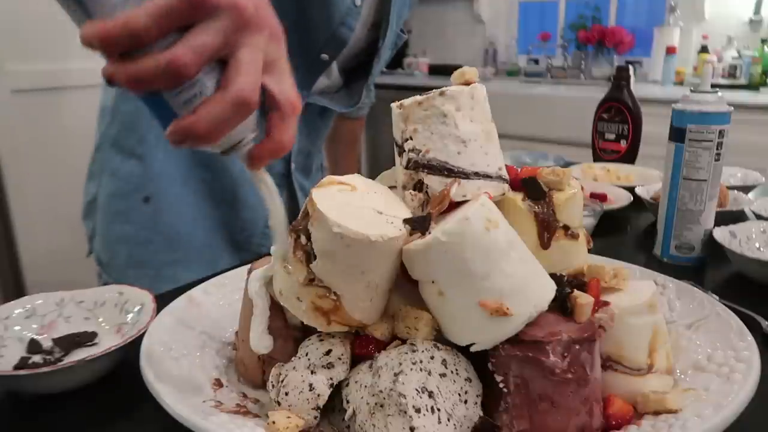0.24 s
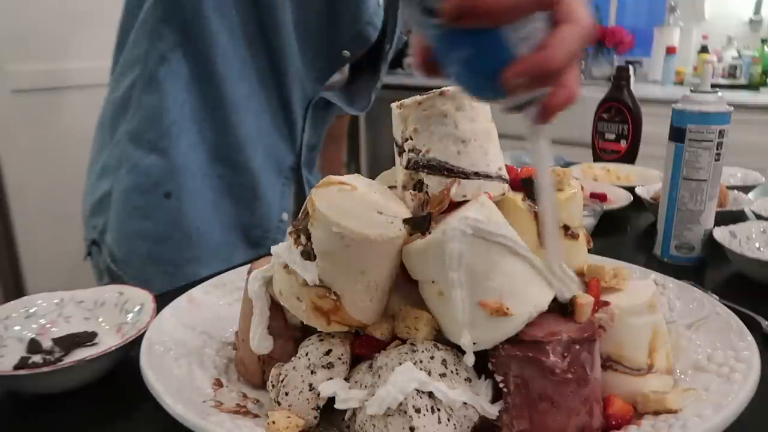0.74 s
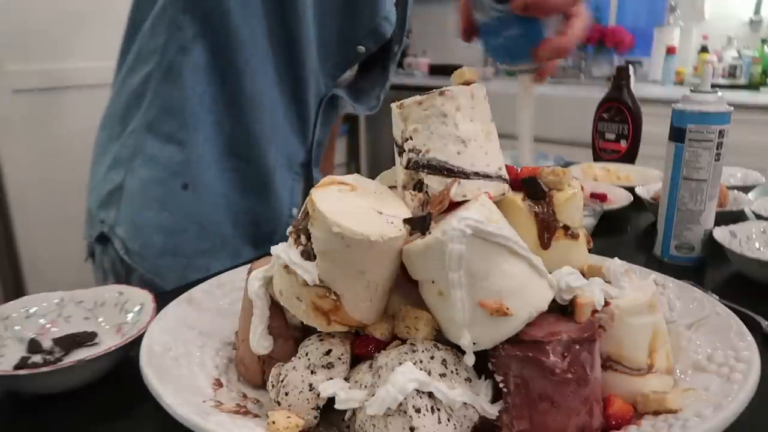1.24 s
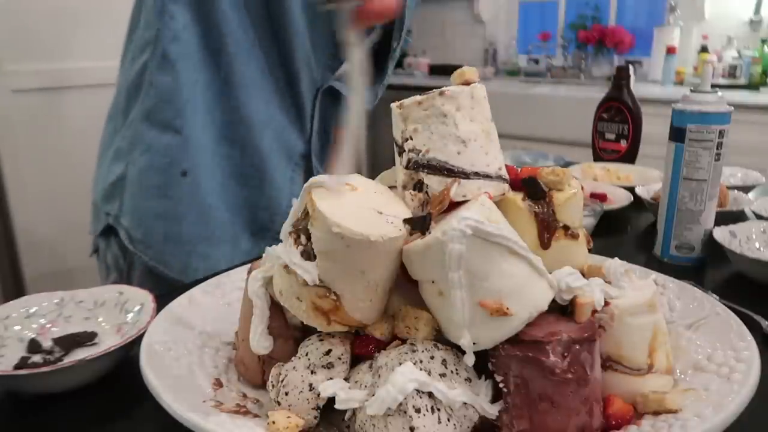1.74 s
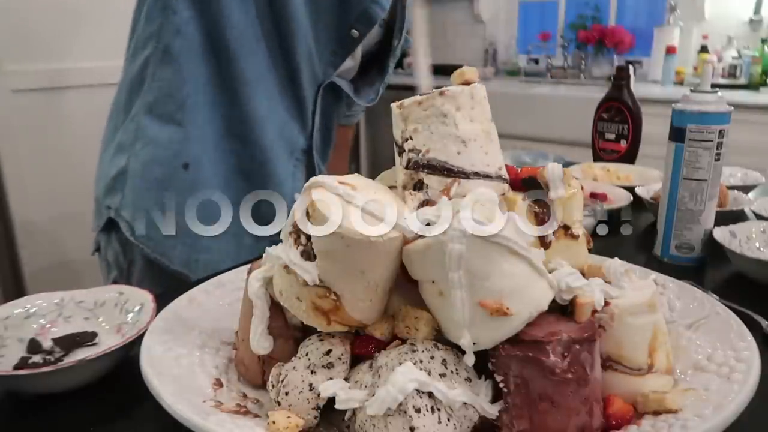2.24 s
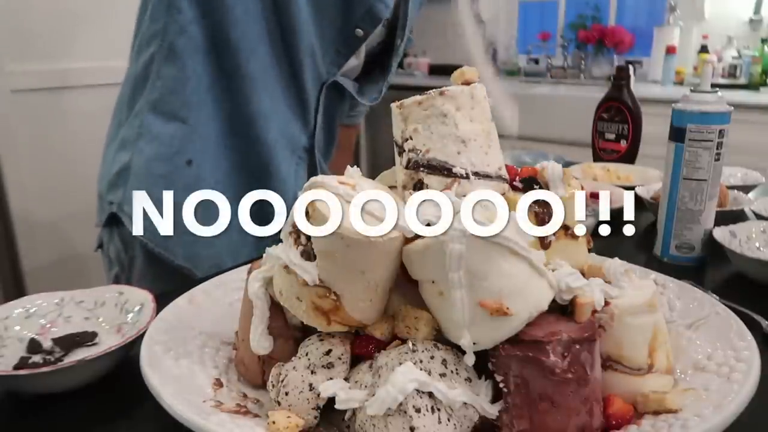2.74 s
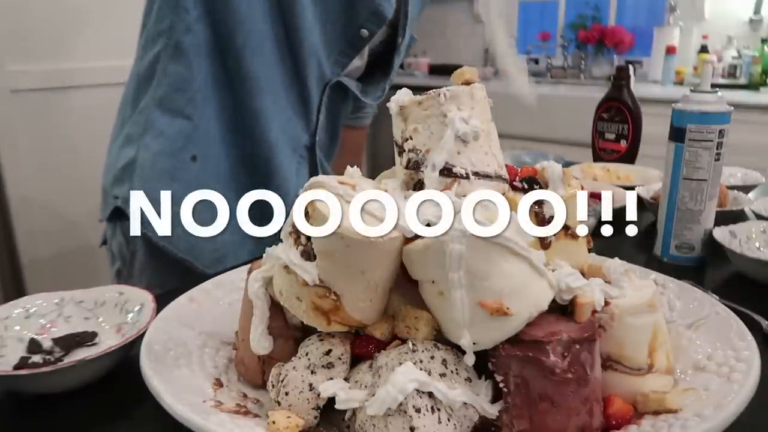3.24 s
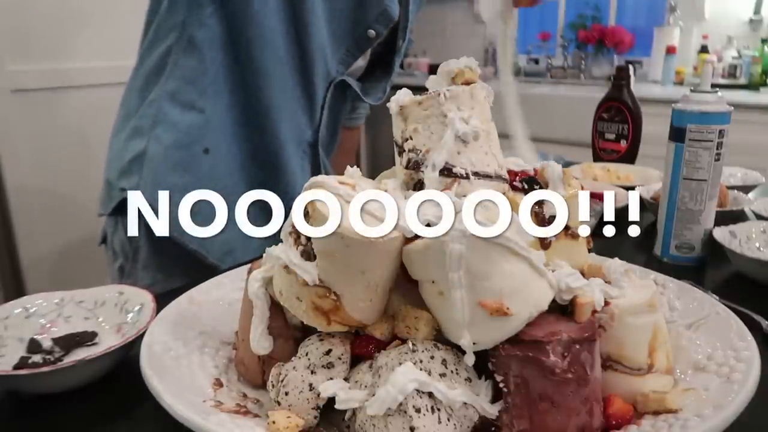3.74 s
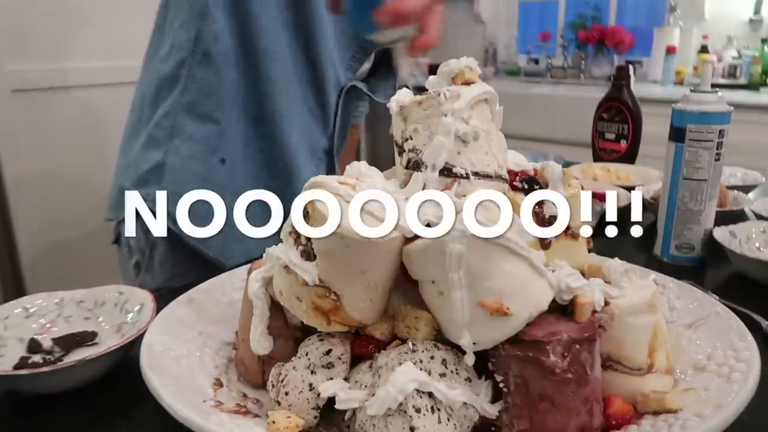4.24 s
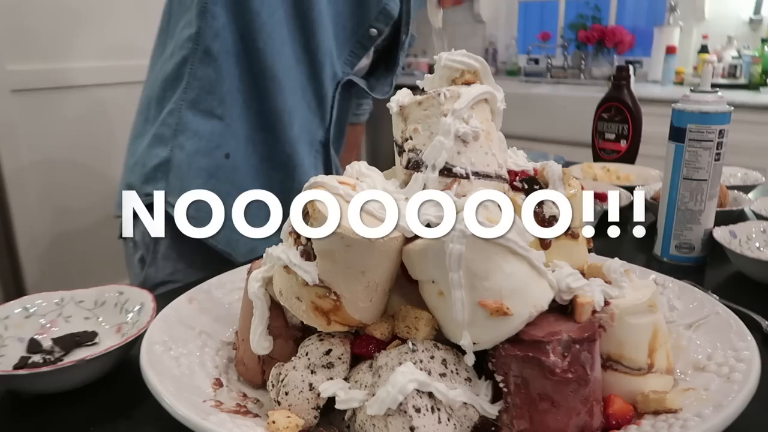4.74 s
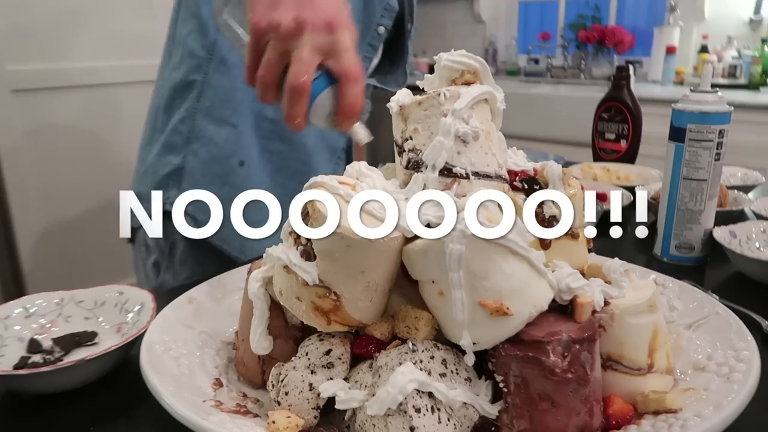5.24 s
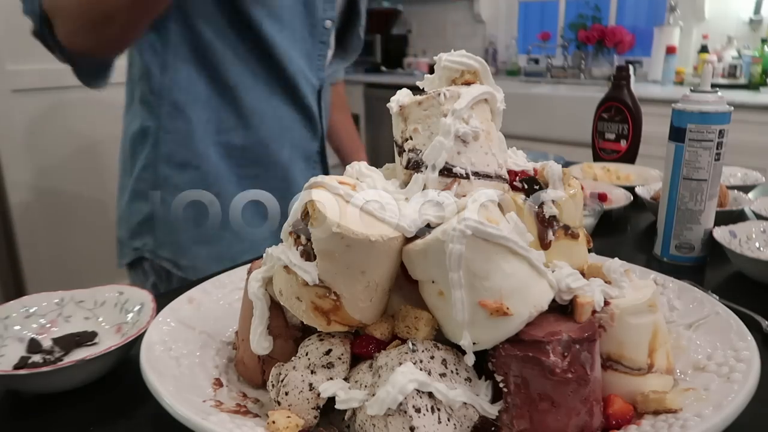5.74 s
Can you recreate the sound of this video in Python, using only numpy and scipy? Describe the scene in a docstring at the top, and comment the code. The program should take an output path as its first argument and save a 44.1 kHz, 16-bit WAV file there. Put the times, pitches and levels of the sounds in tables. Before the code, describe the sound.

A pressurized can sprays whipped cream in a steady whistling hiss, then splutters in wet bursts and airy gas before stopping in a quiet kitchen.

```python
"""A steady hiss of cream opens the scene: a can of whipped cream is sprayed over a dessert in a kitchen.
The hiss is turbulent noise with foam clicks, a nozzle resonance and a valve whistle.
As the can runs low, gas pockets splutter as clumped bursts and bubble pings; dry gas then excites resonances.
A mains sine, a refrigerator's drone and the room lie underneath, and a dull bump follows the end of the spray.
An automatic gain control lowers everything after loud spurts and recovers slowly."""
import sys
import numpy as np
from scipy import signal
from scipy.fft import rfft, irfft
from scipy.io import wavfile
from scipy.ndimage import uniform_filter1d, minimum_filter1d, map_coordinates

SR = 44100
rng = np.random.default_rng(int(sys.argv[2]) if len(sys.argv) > 2 else 0)


def to_wav(s):
    """Save 16-bit WAV."""
    ch = np.atleast_2d(s).T  # columns
    pcm = np.round(np.clip(ch, -1, 1) * 32767)  # PCM
    wavfile.write(sys.argv[1], SR, pcm.astype(np.int16))


N = 264600
TIME = np.arange(N) / SR  # s


def gain_of(db):
    """Decibel law: 20 dB is a factor of ten in amplitude."""
    return 10 ** (np.asarray(db) / 20)


def evened(x):
    """Power normalization: scales a signal to rms 1."""
    return x / np.sqrt(np.mean(x ** 2) + 1e-20)


def read(points, hz):
    """Log-frequency interpolation: reads a table of values over pitch."""
    f, value = np.transpose(points)
    return np.interp(np.log(hz + 1), np.log(f + 1), value)


def controls(rows):
    """Linear interpolation in time: one curve for each column after start_s."""
    s, *columns = np.transpose(rows)
    return [np.interp(TIME, s, c) for c in columns]


def noise():
    """White noise: equal power at all frequencies."""
    return rng.standard_normal(N)


def wander(rate_hz):
    """Low-passed noise: slow random variation of rms 1."""
    hz = np.fft.rfftfreq(N, 1 / SR)
    spectrum = rfft(noise()) * np.exp(-(hz / rate_hz) ** 2)
    return evened(irfft(spectrum, N))


def colour(x, points, size=4096):
    """Minimum-phase filtering: a causal filter of energy 1 whose spectrum follows the table."""
    hz = abs(np.fft.fftfreq(size, 1 / SR))
    log_gain = np.log(gain_of(read(points, hz)))
    response = np.exp(np.conj(signal.hilbert(log_gain)))
    taps = np.fft.ifft(response).real[:size // 2]
    return signal.oaconvolve(x, taps / np.linalg.norm(taps))[:N]


def resonate(x, hz, width, db, bend=1, drift=.014, drift_hz=4):
    """Resonance: two equal peak filters in series; a warped clock bends and drifts the pitch."""
    b, a = signal.iirpeak(hz, hz / width, SR)
    rung = signal.lfilter(b, a, signal.lfilter(b, a, x))
    clock = np.cumsum(bend * np.exp(drift * wander(drift_hz)))
    warped = map_coordinates(rung, [clock], order=3, mode="mirror")
    return gain_of(db) * evened(warped)


def bursts(per_s, spread_db):
    """Poisson process: clicks at random moments, many small and a few large."""
    size = gain_of(spread_db * np.minimum(rng.exponential(1, N), 4))
    sign = rng.choice([-1, 1], N)
    return evened(size * sign * (rng.random(N) < per_s / SR))


def ping(hz, ring_cycles):
    """Damped oscillation: a bubble swells within a cycle, then decays at its own pitch; peak 1."""
    cycles = hz * TIME[:1500]
    swell = (1 - np.exp(-2 * cycles)) ** 2
    wave = np.sin(2 * np.pi * cycles) * swell * np.exp(-cycles / ring_cycles)
    return wave / abs(wave).max()


def held_db(start, end, rise_s, fall_s):
    """Exponential onset and decay: full from start to end; rise_s and fall_s are for 20 dB."""
    early = np.maximum(start - TIME, 0) / rise_s
    late = np.maximum(TIME - end, 0) / fall_s
    return np.maximum(-20 * (early + late), -200)


SHUT_S, SHUT_FALL_S = 5.364, .02


def valve_db():
    """Flow control: the valve stays open until the finger lets go."""
    return held_db(0, SHUT_S, 1, SHUT_FALL_S)


def depth_s(start, end):
    """Distance in time to the nearer end of a gas pocket; zero outside it."""
    return np.maximum(np.minimum(TIME - start, end - TIME), 0)


SIZZLE_HZ, SIZZLE_WIDTH_HZ = 4700, 1400  # the band of the hiss that answers most to the flow
# Level of the hiss's upper middle: start_s [s], level_db [dB]
SIZZLE_LEVEL = [(.2, 0.5), (.88, 2), (1.05, -7), (1.3, -4), (1.48, 2), (2.8, 0), (3.85, -2.5), (4.09, 4.5)]


def sizzle(x):
    """Band emphasis: a faster jet sizzles more in the upper middle; a slow one sounds hollow."""
    b, a = signal.iirpeak(SIZZLE_HZ, SIZZLE_HZ / SIZZLE_WIDTH_HZ, SR)
    band = signal.lfilter(b, a, x)
    return x + band * (gain_of(controls(SIZZLE_LEVEL)[0]) - 1)


# Relative spectrum of the turbulent hiss: pitch_hz [Hz], level_db [dB]
JET_COLOUR = [(100, -19), (300, -0.5), (680, -8), (1050, -2), (1600, -3.5), (2400, -3), (3300, -0.5),
              (4600, 0.5), (6500, -3), (7600, -6), (8600, -15.5), (10000, -21.5), (11500, -66),
              (15000, -48)]
# Cream flow, set by the finger on the valve until the can runs low: start_s [s], level_db [dB]
CREAM_FLOW = [(0, -31.5), (.15, -31), (.35, -28), (.75, -29.5), (.95, -29), (1.08, -30), (1.33, -32.5),
              (1.66, -29), (1.8, -25.5), (1.92, -28.5), (2.15, -32), (2.42, -29.5), (2.78, -33),
              (2.98, -28.5), (3.4, -31.5), (3.92, -28.5), (4.09, -24), (4.48, -28), (5.36, -76)]
# The nozzle's ring as the cream shifts in it: start_s [s], pitch_hz [Hz], level_db [dB over the hiss]
RING = [(0, 2063, 7.5), (.24, 2370, 0), (.36, 2128, 4.5), (.6, 2381, 1), (.8, 2133, 6.5), (.93, 2140, 3.5),
        (1.04, 2226, -7), (1.28, 2435, 4.5), (1.53, 2400, -6), (1.96, 2198, 0.5), (2.25, 2416, 0)]
# Pitch of the valve's whistle: start_s [s], pitch_hz [Hz]
WHISTLE_PITCH = [(.8, 6010), (1.0, 5810), (1.5, 5840), (1.9, 6133), (4.1, 6127), (4.42, 6390)]
# Resonances: pitch_hz, width_hz of each filter, level_db before the moving levels
NOZZLE_RING, VALVE_WHISTLE = (2250, 480, -11.5), (6030, 790, -6)
UPPER_RING, UPPER_RING_GROWTH = (2680, 840, -12.5), 1  # in a fast jet; extra dB per dB of flow
FAST_FLOW_DB = -29.5  # flow of a fast jet
WHISTLE_DB, WHISTLE_FLOW_DB = 1.5, -30.5  # the whistle's moving level at this flow
WHISTLE_YIELD = 0.64  # it stands out less as the valve opens (dB per dB)
WHISTLE_BUILD_S = 0.61  # it takes this long to build
KICK_DB, KICK_S, KICK_POCKET_DB = 14, 0.023, -13.5  # overblowing by a pocket of this strength
CREAM_PARTING_DB_PER_S = 49  # the deeper into a pocket, the less cream passes


def jet(flutter_db=0.5, foam=0.49, body_db=-1.96, waver_db=1.0, build_rise_s=0.5, slack_db=3):
    """Turbulence noise: eddies and tiny foam bubbles hiss, the nozzle rings and the valve slit whistles."""
    flow_db, (ring_hz, ring_db) = controls(CREAM_FLOW)[0], controls(RING)
    parted_db = CREAM_PARTING_DB_PER_S * sum(depth_s(start, end) for start, end, *_ in SPURTS)

    foamy = evened(noise() + foam * bursts(per_s=2500, spread_db=9.0))
    body = gain_of(body_db) * colour(foamy, JET_COLOUR)

    ring = resonate(noise(), *NOZZLE_RING, bend=ring_hz / NOZZLE_RING[0])
    ring = gain_of(ring_db + waver_db * wander(4.0)) * ring
    upper_db = UPPER_RING_GROWTH * np.minimum(flow_db - FAST_FLOW_DB, 2)
    ring = ring + gain_of(upper_db) * resonate(noise(), *UPPER_RING)

    # each pocket overblows the whistle around its start, weaker ones less
    kick = sum(np.exp(-abs(TIME - start) / KICK_S) * gain_of(db - KICK_POCKET_DB)
               for start, _, db, *_ in SPURTS)
    yield_db = WHISTLE_YIELD * np.maximum(flow_db - WHISTLE_FLOW_DB, -slack_db)
    build_db = held_db(WHISTLE_BUILD_S, SHUT_S, build_rise_s, 1)
    whistle_db = WHISTLE_DB - yield_db + KICK_DB * kick + build_db
    whistle_bend = controls(WHISTLE_PITCH)[0] / VALVE_WHISTLE[0]
    whistle = resonate(noise(), *VALVE_WHISTLE, bend=whistle_bend)
    whistle = gain_of(whistle_db + waver_db * wander(5.2)) * whistle

    level_db = flow_db - parted_db + valve_db() + flutter_db * wander(110)
    return gain_of(level_db) * (sizzle(body) + ring + whistle)


# Gas pockets breaking through the cream: start_s [s], end_s [s], level_db [dB, before the splutter's trim],
# rise_s [s per 20 dB, before the start], fall_s [s per 20 dB, after the end], core_change_db [dB],
# gurgle_db [dB over the crackle's strength], core_pitch_hz [Hz, gurgle in the core]
SPURTS = [(0, 0.02, -46, .015, .15, 0, -26, 1000), (1.784, 1.811, -31.5, 0.027, 0.041, 2, 6, 807),
          (2.485, 2.639, -13.5, 0.032, 0.014, -4, -3, 1848),
          (3.048, 3.175, -13.5, 0.027, 0.024, -3.5, 0, 1850),
          (3.474, 3.627, -14.5, 0.019, 0.015, 3.5, 4, 1549),
          (4.104, 4.438, -14.5, 0.057, 0.023, -6, 5, 1350), (4.549, 4.862, -17, 0.022, 0.29, -1.5, 0, 1756)]
GURGLE = (1020, 610, -8)  # pitch_hz at the ends of a pocket, width_hz of each filter, level_db
WET_EDGE_S, CORE_GURGLE_DB = 0.13, -7  # a pocket is wet at both ends; its core gurgles less
OPENING_S = .022  # the gurgle's pitch shifts as a pocket opens the nozzle, and returns as the cream closes in


def pockets():
    """Two-phase flow: amplitudes of crackle and gurgle, and the gurgle's pitch, over all gas pockets."""
    crackle, gurgle, shift_hz = np.zeros((3, N))
    for start, end, db, rise_s, fall_s, core_change_db, gurgle_db, core_hz in SPURTS:
        depth = depth_s(start, end)
        core = 1 - np.exp(-depth / WET_EDGE_S)
        envelope_db = held_db(start, end, rise_s, fall_s) + valve_db()
        strength = gain_of(db + envelope_db + core_change_db * core)
        crackle += strength
        gurgle += strength * gain_of(gurgle_db + CORE_GURGLE_DB * core)
        shift_hz += (core_hz - GURGLE[0]) * (1 - np.exp(-depth / OPENING_S))
    return crackle, gurgle, GURGLE[0] + shift_hz


def bubbles(low_hz=950, high_hz=4800, ring_cycles=3.0, count=30):
    """Bubble resonance: bubbles of many sizes each ring for a few cycles at their own pitch."""
    pops, kind = bursts(per_s=750, spread_db=5.5), rng.integers(0, count, N)
    out = np.zeros(N)
    for k, hz in enumerate(np.geomspace(low_hz, high_hz, count)):
        sound = ping(hz, ring_cycles) * np.sqrt(hz)  # evens the energy of short and long pings
        out += signal.oaconvolve(pops * (kind == k), sound)[:N]
    return evened(out)


# Relative spectrum of the bursting pockets: pitch_hz [Hz], level_db [dB]
POP_COLOUR = [(90, -34), (180, -9.5), (320, -4.5), (530, -12.5), (750, -4), (1000, -2.5), (1400, -3.5),
              (1850, 0), (2600, -3), (4000, 0), (5500, -5.5), (7500, -18.5), (10000, -25), (11500, -68),
              (14500, -38)]
BUBBLY, BIG_POPS, RUSH = .52, .85, 1.25  # shares of ringing bubbles, big pops and smooth rush


def splutter(clump_db=2.0, level_db=1.5, lurch_db=3):
    """Impulsive noise: gas pockets burst in quick clumps among ringing bubbles, and gurgle in the nozzle."""
    strength, gurgling, gurgle_hz = pockets()
    clumps = wander(380)
    clumps = clumps - uniform_filter1d(clumps, size=1300)  # the can's pressure keeps the mean flow even
    small, large = bursts(per_s=2200, spread_db=0.5), bursts(per_s=420, spread_db=2.5)
    crackle = evened(colour(small + BIG_POPS * large + RUSH * noise(), POP_COLOUR))
    crackle = evened(crackle + BUBBLY * bubbles())
    bend = gurgle_hz / GURGLE[0]
    gurgle = resonate(large + noise(), *GURGLE, bend=bend, drift=.13, drift_hz=45.18)
    gurgle = gain_of(lurch_db * wander(83)) * gurgle
    return gain_of(level_db + clump_db * clumps) * (strength * crackle + gurgling * gurgle)


def plate_echo(x, delay_s=0.001568, sway=0.259):
    """Comb filtering: the can circles over the plate, so the echo's drifting delay sweeps the colour."""
    delay = delay_s * np.exp(sway * wander(1.4))
    return x + .17 * map_coordinates(x, [(TIME - delay) * SR], order=3)


# Decay of the room's tail: pitch_hz [Hz], t60_s [s for 60 dB]
KITCHEN = [(800, 0.7), (1800, 0.62), (2200, 0.2), (2700, 0.55), (12000, 0.66)]


def echoes(near_db=-14, tail_db=-12.0, near_s=0.0067):
    """Early reflections and reverberation: quick counter echoes, then the tail of a hard-walled room."""
    t = TIME[:SR]
    near = rng.standard_normal(SR) * (rng.random(SR) < 1500 / SR)
    near = near * np.exp(-t / near_s) * (t > .001)
    taps = rng.standard_normal(SR) * (t > .008)
    hz, at, z = signal.stft(taps, SR, nperseg=256)
    decay = gain_of(-60 * at / read(KITCHEN, hz)[:, None])
    tail = signal.istft(z * decay, SR)[1][:SR]
    near = gain_of(near_db) * near / np.linalg.norm(near)
    return near + gain_of(tail_db) * tail / np.linalg.norm(tail)


def kitchen(x, count=12):
    """Room response: as the can moves from spot to spot, one pattern of echoes fades into the next."""
    spot = np.linspace(0, count - 1, N)
    out = np.zeros(N)
    for k in range(count):
        share = np.sqrt(np.maximum(1 - abs(spot - k), 0))
        out += signal.oaconvolve(x * share, echoes())[:N]
    return out


BOWL_RING = (2165, 410, -26)  # pitch_hz, width_hz of each filter, level_db


def bowl(x):
    """Cavity resonance: the hollow of a dish colours the echo, which dies away in one breathy band."""
    decay = gain_of(-60 * TIME[:SR] / .6)  # 60 dB in 0.6 s
    ring = resonate(noise(), *BOWL_RING)[:SR] * decay
    return gain_of(BOWL_RING[2]) * signal.oaconvolve(x, ring / np.linalg.norm(ring))[:N]


# Relative spectrum of the room's murmur: pitch_hz [Hz], level_db [dB]
AIR = [(30, -21), (50, -12), (80, -3.5), (150, -6), (230, 1), (330, -3.5), (550, -12.5), (1000, -20),
       (2500, -24.5), (5000, -33), (10000, -44), (15000, -80)]


def air(db=-43.0):
    """Background noise: the low murmur of the room."""
    return gain_of(db) * colour(noise(), AIR)


HUM = (59.4, -41.5)  # pitch_hz, level_db (rms)
# Bands of the refrigerator's drone: pitch_hz [Hz], width_hz [Hz, of each filter], level_db [dB]
DRONE = [(107, 22, -46), (208, 13.4, -48.5)]


def hum():
    """Tone and narrow-band noise: a clean mains hum over the soft, unsteady drone of a refrigerator."""
    hz, db = HUM
    mains = gain_of(db) * np.sqrt(2) * np.sin(2 * np.pi * (hz * TIME + rng.random()))
    return mains + sum(resonate(noise(), *band) for band in DRONE)


def port_difference(x, side_db, scatter_rad):
    """Decorrelation: what two microphone ports do not share, with ever-changing phases."""
    hz, _, z = signal.stft(x, SR, nperseg=512, noverlap=256)
    phase = np.pi / 2 + scatter_rad * rng.standard_normal(z.shape)
    level = gain_of(read(side_db, hz))[:, None]
    return signal.istft(z * np.exp(1j * phase) * level, SR)[1][:N]


# Port difference for sound straight from the can: pitch_hz [Hz], level_db [dB, difference minus sum]
DIRECT_SIDE = [(1000, -77), (2600, -57), (4400, -9), (6200, -5.5), (9000, 3), (11200, 18.5), (13500, 0)]
# Port difference for sound from all around: pitch_hz [Hz], level_db [dB, difference minus sum]
ROOM_SIDE = [(60, -57), (400, -6.5), (1200, -28.5), (5000, -0.5)]


def ports(direct, room):
    """Spatial coherence: two close ports hear the same bass; treble and echoes reach them differently."""
    side = port_difference(direct, DIRECT_SIDE, 1.3) + port_difference(room, ROOM_SIDE, np.pi)
    return np.array([direct + room + side, direct + room - side])


# Single large bubbles at the tip; some just snap, others ring on as a wet blip:
# start_s [s], level_db [dB peak, before a common trim], pitch_hz [Hz], ring_cycles [cycles]
SPITS = [(.022, -13.5, 2300, 1), (1.7431, -13, 1960, 0.59), (1.783, -13.5, 2660, 3), (1.786, -24, 293, 2.8),
         (1.797, -25, 458, 1.1), (1.805, -12, 2980, 0.78), (2.475, 2, 2854, 1.2), (2.4844, -5, 3234, 1.6),
         (2.494, -7, 1840, 7), (2.518, -2.5, 1933, 10), (2.5326, -7, 3040, 1.6), (2.554, -5, 1940, 5.5),
         (2.604, -8, 3900, 5.5), (2.635, -11, 1663, 4.9), (3.032, -2.5, 2352, 0.73), (3.045, 1, 3484, 1.7),
         (3.049, -4.5, 1890, 4.2), (3.063, 1, 1920, 1.3), (3.1403, -5, 1926, 2.9), (3.159, -4.5, 3890, 8.8),
         (3.463, -5, 2805, 0.62), (3.4653, 0, 2298, .8), (3.478, -6, 1350, 6.6), (3.4987, 3.5, 1740, 1.3),
         (3.534, -6, 1830, 6.06), (3.570, 5.5, 2040, 0.47), (4.093, -10, 1320, 5.8),
         (4.141, -6.5, 1447, 6.3), (4.149, -8, 1004, 2.1), (4.168, 5, 1728, 0.5), (4.413, -9, 1006, 4.4),
         (4.436, -6.5, 1000, 1.8), (4.546, -5, 3800, 2.7), (4.567, 4, 1646, 0.76), (4.595, -7.5, 1800, 6.6),
         (4.623, -7, 1890, 2.7), (4.652, -8, 1760, 13), (4.7435, 2.5, 1990, 2.3), (4.828, -12, 1129, 1.8),
         (5.310, -8, 1800, 5.7)]


def spits(level_db=-1):
    """Bubble resonance: the large bubbles sound one by one as damped oscillations."""
    out = np.zeros(N)
    for s, db, hz, ring_cycles in SPITS:
        sound = gain_of(db + level_db) * ping(hz, ring_cycles)
        out[round(s * SR):][:len(sound)] += sound
    return out


# Resonances of the hollow nozzle: pitch_hz [Hz, at GAS_TUNED_S], width_hz [Hz, of each filter],
# level_db [dB, relative]
GAS_MODES = [(1167, 446, -9), (1880, 470, 0), (2420, 490, -1.5), (2800, 480, -2), (3410, 490, -6),
             (4420, 520, -12.5)]
# Moving level of the lowest gas resonance: start_s [s], level_db [dB]
LOW_MODE = [(4.6, -7), (5.0, 4.5), (5.15, -4), (5.23, -9), (5.3, 2.5), (5.36, 4)]
# Moving level of the third and sixth gas resonance: start_s [s], level_db [dB]
SQUEEZE = [(5.13, -3), (5.23, 6.5), (5.3, 0)]
# Relative spectrum of the fizz: pitch_hz [Hz], level_db [dB]
FIZZ = [(2000, -3), (5000, 5), (7000, -5.5), (9800, 0), (11500, -13), (14800, -14)]
# Flow of the last dry gas: start_s [s], level_db [dB, before the common trim]
GAS_FLOW = [(4.6, -26), (4.85, -23), (5.02, -15.5), (5.11, -20), (5.21, -19), (5.265, -20), (5.303, -12.5),
            (5.33, -15), (5.36, -15.5)]
RUNS_LOW_S, DRYING_S = 4.1, 0.3  # pockets carry dry gas in full from here; rise time for 20 dB
POCKET_GAS_DB = -8.5  # dry gas under a pocket's strength
FIZZ_DB, FIZZ_FLOW_DB = -6.5, -19  # fizz over the gas at the shut, up to this flow
FIZZ_YIELD = 1  # it stands out less in a strong rush (dB per dB)
FIZZ_GROWTH_DB_PER_S = 15.5  # it grows as the nozzle dries
GAS_CLIMB_PER_S, GAS_TUNED_S = .14, 5.2  # resonances rise as the hollow empties; listed pitch at this time


def dry_gas(flutter_db=0.0, waver_db=1.5, level_db=-1):
    """Cavity resonance: with little cream to damp it, the hollow nozzle sounds under a fine fizz."""
    rush_s = GAS_FLOW[0][0]
    in_pockets = pockets()[0] * gain_of(POCKET_GAS_DB + held_db(RUNS_LOW_S, SHUT_S, DRYING_S, 1))
    last_rush = gain_of(controls(GAS_FLOW)[0] + held_db(rush_s, SHUT_S, DRYING_S, SHUT_FALL_S))
    flow_db = 20 * np.log10(np.hypot(in_pockets, last_rush))

    emptying_s = np.clip(TIME, rush_s, SHUT_S)
    climb = 1 + GAS_CLIMB_PER_S * (emptying_s - GAS_TUNED_S)
    low_gain, squeeze_gain = gain_of(controls(LOW_MODE)[0]), gain_of(controls(SQUEEZE)[0])
    moving_gain = [low_gain, 1, squeeze_gain, 1, 1, squeeze_gain]  # one for each mode
    hollow = np.zeros(N)
    for mode, gain in zip(GAS_MODES, moving_gain):
        ring = resonate(noise(), *mode, bend=climb, drift=.025, drift_hz=8)
        hollow += gain * ring * gain_of(waver_db * wander(22))

    growth_db = FIZZ_GROWTH_DB_PER_S * (emptying_s - SHUT_S)
    fizz_db = FIZZ_DB + growth_db - FIZZ_YIELD * np.maximum(flow_db - FIZZ_FLOW_DB, 0)
    fizz = gain_of(fizz_db) * colour(noise(), FIZZ)
    return gain_of(level_db + flow_db + flutter_db * wander(120)) * (evened(hollow) + fizz)


THRUM = (183, 71, -31.5)  # pitch_hz, width_hz of each filter, level_db before the swell
THRUM_S, THRUM_HALF_LENGTH_S = 4.94, .06  # centre and spread


def thrum():
    """Narrow-band noise: a brief low thrum, as the gas blows onto the dessert."""
    swell = np.exp(-((TIME - THRUM_S) / THRUM_HALF_LENGTH_S) ** 2)
    return swell * resonate(noise(), *THRUM)


def soft_bump(s=5.622, length=0.039, db=-43):
    """Low-passed transient: a dull bump as the arm draws back."""
    spectrum = [(100, -46), (500, 11.5), (1100, -3), (5000, -12), (12000, -57)]  # (Hz, dB)
    swell = np.exp(-((TIME - s) / length) ** 2)
    return gain_of(db) * swell * colour(noise(), spectrum)


def scene():
    """Superposition: the can, its echoes and the kitchen's own sounds add up at the two ports."""
    can = plate_echo(jet() + splutter() + spits() + dry_gas()) + soft_bump() + thrum()
    return ports(can, kitchen(can) + bowl(can) + air()) + hum()


EDGE_HZ = 15300  # upper band limit


def record(dry, threshold_db=-14, recover_db_per_s=5.0):
    """Dynamic compression: gain falls quickly and recovers slowly; then a peak limiter and a band limit."""
    power = abs(uniform_filter1d((dry ** 2).mean(0), size=500))
    power_db = 10 * np.log10(power + 1e-12)
    fall = TIME * recover_db_per_s
    held_power_db = np.maximum.accumulate(power_db + fall) - fall  # peaks, sinking at the recovery rate
    over_db = np.maximum(held_power_db - threshold_db, 0)
    ducked = dry / gain_of(uniform_filter1d(over_db, size=150))

    headroom = .85 / np.maximum(abs(ducked).max(0), .85)
    limited = ducked * uniform_filter1d(minimum_filter1d(headroom, size=61), size=61)
    low_pass = signal.firwin(511, EDGE_HZ, window=("kaiser", 9), fs=SR)
    return signal.oaconvolve(limited, low_pass[None], "same")


dry = scene()
out = record(dry)
to_wav(out)
```